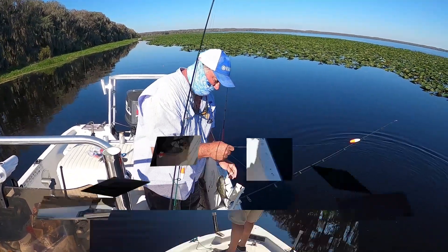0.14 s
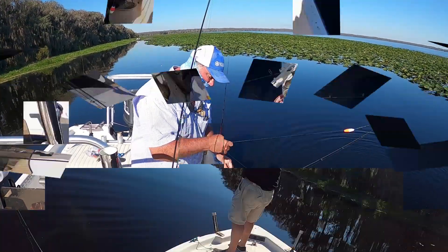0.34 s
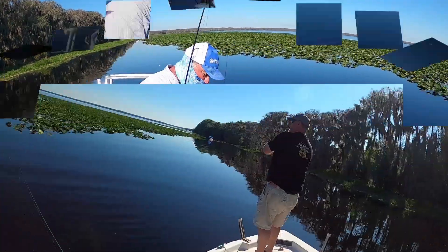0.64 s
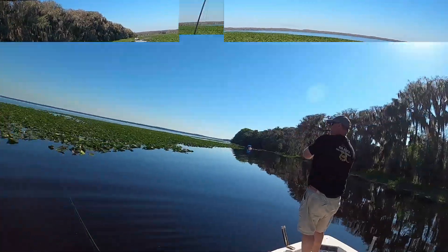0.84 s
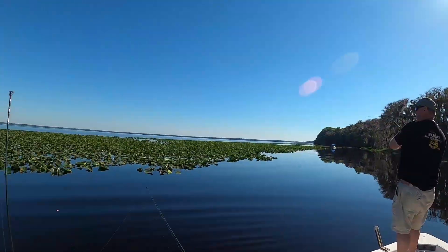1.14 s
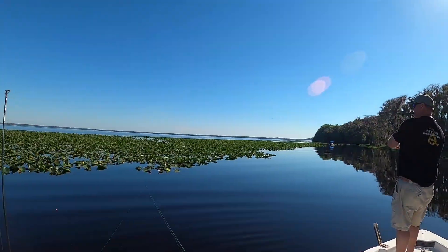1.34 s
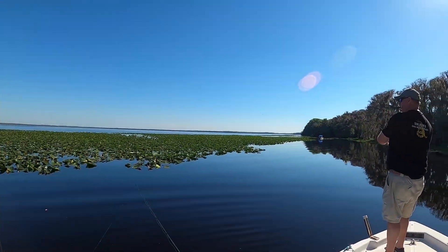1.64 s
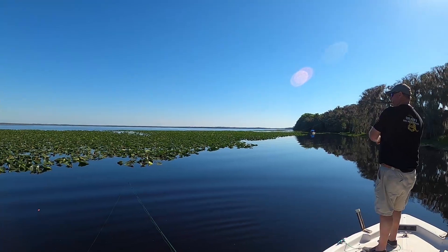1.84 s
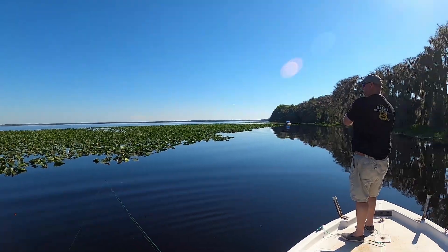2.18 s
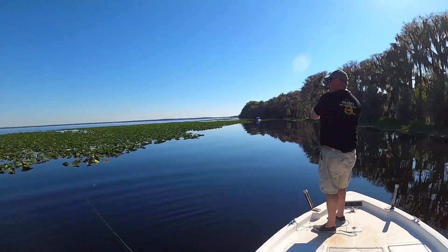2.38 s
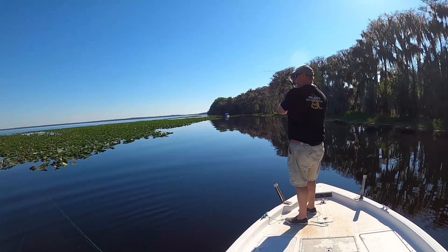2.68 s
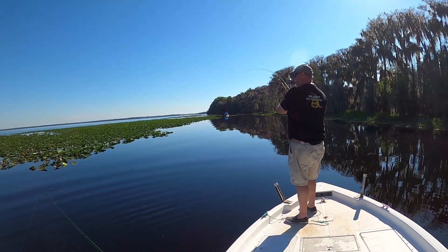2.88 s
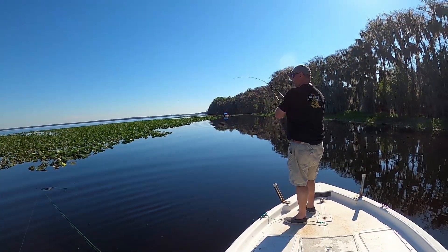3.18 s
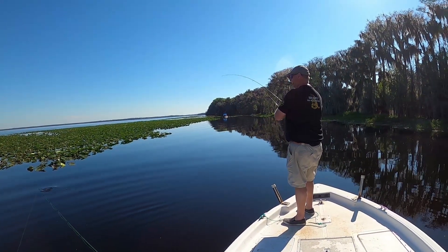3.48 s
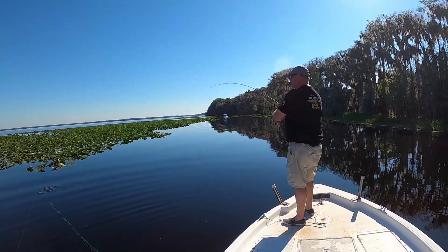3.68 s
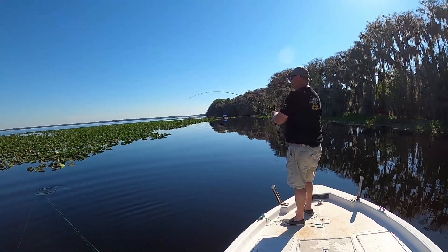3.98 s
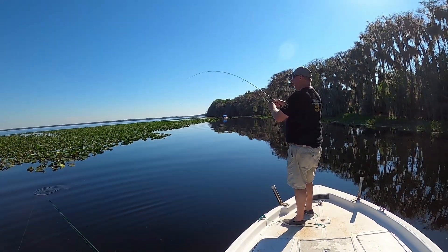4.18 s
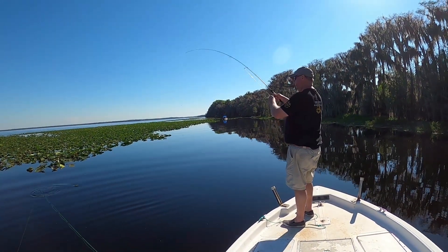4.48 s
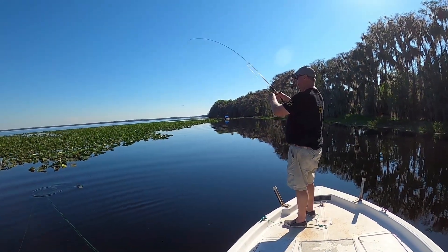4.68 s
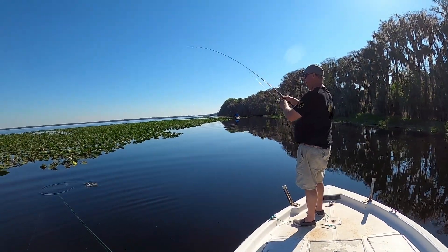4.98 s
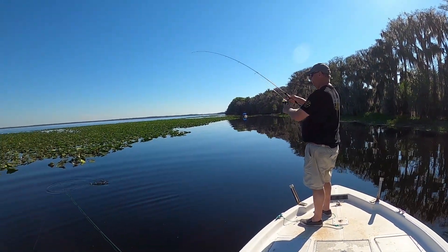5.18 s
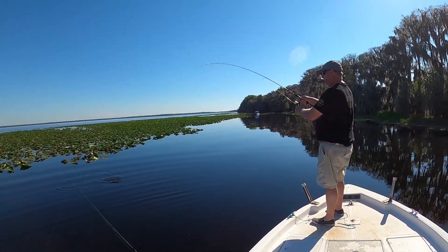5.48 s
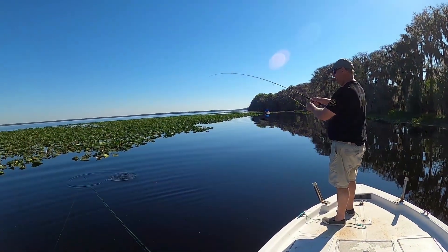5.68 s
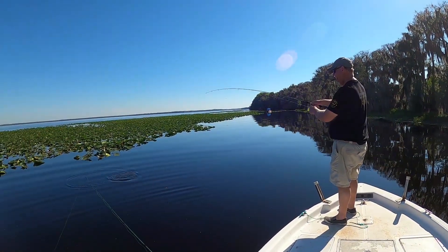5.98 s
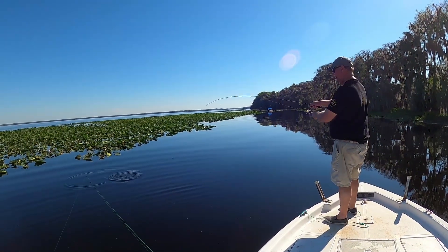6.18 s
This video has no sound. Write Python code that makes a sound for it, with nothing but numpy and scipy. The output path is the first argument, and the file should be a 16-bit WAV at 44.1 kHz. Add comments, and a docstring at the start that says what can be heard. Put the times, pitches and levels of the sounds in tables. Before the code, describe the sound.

Hard plastic clacks and dull hollow thumps on a small fiberglass boat over a low drone, a brief silence early, faint distant splashes later.

```python
"""Scuffs, clacks, creaks and dull thumps on a small fiberglass fishing boat on a calm lake: a camera on a mount
is gripped and swung round, while a hooked fish splashes some way off. Under it lie a low drone and a faint
hiss; near the start all sound stops for a moment and the scene changes, the opening having fainter air and a
drone that differs between the ears. Clacks are shaped noise bursts plus struck modes, creaks trains of jerks,
thumps and bubbles decaying sines; scuffs, swishes, spray, drone and hiss are coloured noise under envelopes."""
import sys
import numpy as np
from scipy import signal
from scipy.fft import rfft, irfft, next_fast_len
from scipy.io import wavfile
from scipy.ndimage import map_coordinates

SR = 44100
rng = np.random.default_rng(int(sys.argv[2]) if len(sys.argv) > 2 else 0)


def to_wav(s):
    """Save 16-bit WAV."""
    ch = np.atleast_2d(s).T  # columns
    pcm = np.round(np.clip(ch, -1, 1) * 32767)  # PCM
    wavfile.write(sys.argv[1], SR, pcm.astype(np.int16))


N = 279367

# dropout of all sound: (from t/s, to t/s)
DROPOUT_S = (.575, .808)
# bouts of movement aboard: (start t/s, length/s, level/dB)
BOUTS = [(0, .57, -42), (.85, .4, -38.5), (1.37, .25, -48), (2.26, .1, -40), (2.37, .3, -34),
         (2.8, .28, -42), (3.45, .1, -48), (3.83, .1, -44), (4.04, .1, -36), (5.52, .3, -39),
         (5.98, .2, -46.5)]
# spectrum of a crack at contact: (f/Hz, relative density/dB)
CRACK_SPECTRUM = [(200, -2), (500, 4.5), (740, 4), (900, -7), (1500, 0.5), (2800, -0.5), (4200, -6),
                  (6200, -15), (7600, -23), (9200, -26), (11000, -38.5), (15000, -58.5)]
# spectrum of the low drone: (f/Hz, relative density/dB)
DRONE_SPECTRUM = [(32, -32), (55, -13), (75, -1), (92, -7), (118, 1), (176, -8.5), (197, -6), (217, -3),
                  (251, -11.5), (276, -15.5), (323, -18), (365, -17.5), (615, -28.5), (678, -41.5),
                  (1000, -43), (1300, -58), (2200, -120)]


def amp(db):
    """Decibels to gain."""
    return 10 ** (np.asarray(db) / 20)


def unit(x):
    """Scale to rms 1."""
    return x / np.sqrt(np.mean(x ** 2) + 1e-20)


def along(points, hz):
    """(f/Hz, value) points interpolated on a log frequency axis."""
    f, v = np.transpose(points)
    return np.interp(np.log(hz + 1), np.log(f + 1), v)


def curves(rows, outside=None):
    """One value per sample for each column after the time."""
    s, *cols = np.transpose(rows)
    return [np.interp(np.arange(N) / SR, s, c, outside, outside) for c in cols]


def wobble(knots_per_s):
    """Smooth random curve through normally distributed knots."""
    knots = rng.standard_normal(int(N * knots_per_s / SR) + 4)
    return map_coordinates(knots, [np.arange(N) * knots_per_s / SR])


def filtered(x, response):
    """x filtered by a zero-phase gain of frequency."""
    m = next_fast_len(N + SR // 2)
    return irfft(rfft(x, m) * response(np.fft.rfftfreq(m, 1 / SR)), m)[..., :N]


def lowpassed(x, order, cutoff_hz):
    """Butterworth lowpass."""
    return signal.lfilter(*signal.butter(order, cutoff_hz, fs=SR), x)


def noise(spectrum, grain_db=0, grain_rate=300):
    """Coloured noise of rms 1, optionally clumped into grains."""
    clumps = amp(grain_db * wobble(grain_rate))
    return unit(filtered(clumps * rng.standard_normal(N), lambda hz: amp(along(spectrum, hz))))


def causal(x, gain):
    """Minimum-phase filter with a gain per frequency bin: no ringing ahead of the sound."""
    cepstrum = irfft(np.log(np.maximum(gain, 1e-6)))
    cepstrum[1:len(x) // 2] *= 2
    cepstrum[len(x) // 2 + 1:] = 0
    return irfft(rfft(x) * np.exp(rfft(cepstrum)))


def add(track, s, sound):
    """Mix a sound into the track at time s."""
    part = track[max(round(s * SR), 0):][:len(sound)]
    part += sound[:len(part)]


def envelope(start, length, attack_s, release_db_per_s):
    """Gain that rises to 1 at the start, holds for the length and dies away."""
    t = np.arange(N) / SR - start
    return np.clip(1 + t / attack_s, 0, 1) * amp(-release_db_per_s * np.maximum(t - length, 0))


def after_gap():
    """True from the middle of the dropout on."""
    return np.arange(N) / SR > np.mean(DROPOUT_S)


def ambient(deck):
    """Drone and open air; movement aboard and the deck's thumps stir the hull above them."""
    # bass of the stirred hull: (f/Hz, relative density/dB)
    rumble_spectrum = [(10, -6), (25, 5.5), (45, 9), (75, 6.5), (110, -18.5), (200, -61), (500, -120)]
    # open air: (f/Hz, relative density/dB)
    air_spectrum = [(350, -21), (600, -1.5), (850, -5.5), (1300, 2), (2100, -5.5), (4000, -18), (7000, -22),
                    (11000, -51)]
    # narrow hum inside the drone: (f/Hz, relative density/dB)
    hum_spectrum = [(180, -45.5), (200, -8.5), (215, -0.5), (232, -8.5), (260, -44.5), (1000, -120)]
    # open air over time: (t/s, level/dB)
    air_level = [(1.5, -64), (2.2, -66.5), (3.9, -68), (4.35, -72), (4.9, -68), (5.4, -69), (6.3, -72.5)]
    floor_rumble_db, floor_drone_db, hum_db = -62, -46.5, -55.5
    rumble_db, boom_db, clatter_db = 2.5, -2, -25.5  # bass, low mids and mids, over the bout
    attack_s, release_db_per_s = .04, 75
    aftersound_db, aftersound_s = -20, .045  # the hull booms on after each thump
    boom_top_hz = 300  # shifting weight stirs mostly the low panels
    opening_air_db = -11  # fainter air, without hum, before the gap

    bouts = [amp(db) * envelope(s, length, attack_s, release_db_per_s) for s, length, db in BOUTS]
    stir = np.max(bouts, 0)
    keep = np.exp(-1 / (aftersound_s * SR))
    deck_power = signal.lfilter([1 - keep], [1, -keep], deck ** 2)
    aftersound = amp(aftersound_db) * np.sqrt(deck_power)

    boom = amp(boom_db) * stir * unit(lowpassed(noise(DRONE_SPECTRUM), 1, boom_top_hz))
    rumble = np.hypot(amp(floor_rumble_db), amp(rumble_db) * stir) * noise(rumble_spectrum)
    drone = np.hypot(amp(floor_drone_db) * after_gap(), aftersound) * noise(DRONE_SPECTRUM)
    air = np.hypot(amp(curves(air_level)[0]), amp(clatter_db) * stir) * noise(air_spectrum)
    hum = amp(hum_db) * noise(hum_spectrum)
    return rumble + boom + drone + np.where(after_gap(), air + hum, amp(opening_air_db) * air)


def swish():
    """Faint hiss swelling into swishes with a narrow airy band, perhaps a sleeve as the camera turns."""
    # swishes: (middle t/s, half length/s, broad hiss level/dB, narrow band level/dB)
    swish_rows = [(1.12, .08, -63, -80), (1.86, .07, -62.5, -62), (2.09, .08, -72, -66),
                  (2.36, .08, -60, -80), (3.3, .1, -69, -80), (3.75, .06, -72, -64), (3.9, .05, -64, -69),
                  (4.6, .08, -75, -80), (5.25, .15, -71, -85), (5.58, .06, -61, -80), (6.33, .05, -73, -80)]
    # broad hiss: (f/Hz, relative density/dB)
    hiss_spectrum = [(1500, -18), (2400, -2.5), (3600, -1), (4400, -2.5), (5100, -3.5), (5700, -3.5),
                     (6700, -7), (7800, -15.5), (8900, -10), (10500, -23), (12000, -45.5), (15000, -67.5)]
    # narrow band: (f/Hz, relative density/dB)
    band_spectrum = [(1500, -60), (3400, -25), (4300, 0), (4900, 1), (5400, -2), (6200, -18), (12000, -70)]
    floor_hiss_db = -84
    t = np.arange(N) / SR
    broad, narrow = amp(floor_hiss_db), 0
    for s, half_length, hiss_db, band_db in swish_rows:
        swell = np.exp(-.5 * ((t - s) / half_length) ** 2)
        broad = broad + amp(hiss_db) * swell
        narrow = narrow + amp(band_db) * swell
    band = noise(band_spectrum, grain_db=2.5, grain_rate=53)
    return broad * noise(hiss_spectrum, grain_db=2.0, grain_rate=500) + narrow * band


def rubbing():
    """Skin drags over the housing in gritty grains, stroke by stroke."""
    # strokes of a hand: (start t/s, length/s, scrape level/dB, body level/dB, scrape lowpass f/Hz)
    stroke_rows = [(0, .005, -45, -50, 1900), (.08, .035, -51, -40, 1300), (.187, .025, -61, -54, 1700),
                   (.838, .025, -42.5, -37, 4000), (.875, .018, -40, -32, 4000),
                   (.943, .012, -46, -38, 7400), (1.008, .02, -51, -58, 7400), (1.05, .09, -52, -58, 4000),
                   (1.15, .045, -44, -42, 7400), (1.81, .07, -64, -58, 5000), (2.43, .04, -51, -43, 6000),
                   (5.495, .06, -59, -58, 7400)]
    # gritty scrape: (f/Hz, relative density/dB)
    scrape_spectrum = [(500, -22), (900, -13), (1600, 2.5), (2200, 0), (2800, 4), (3500, -5), (4600, -0.5),
                       (6000, -15), (9500, -24.5), (12000, -44), (15000, -59)]
    # body of the housing: (f/Hz, relative density/dB)
    housing_spectrum = [(150, -21.5), (240, -8), (330, 0.5), (400, -1.5), (455, -4), (495, 6.5),
                        (545, -9.5), (620, -15.5), (750, -5.5), (900, -21), (1200, -16.5), (1700, -35),
                        (5000, -81.5)]
    attack_s, release_db_per_s = .018, 340
    track = np.zeros(N)
    grit = noise(scrape_spectrum, grain_db=3.5, grain_rate=280)
    body = noise(housing_spectrum, grain_db=1.5, grain_rate=77)
    for start, length, scrape_db, body_db, top_hz in stroke_rows:
        scrape = unit(lowpassed(grit, 2, min(top_hz, SR / 2 - 1)))
        pressure = envelope(start, length, attack_s, release_db_per_s)
        track += pressure * (amp(scrape_db) * scrape + amp(body_db) * body)
    return track


def ring(t, damping, scatter_db):
    """Decaying modes of the plastic mount, struck at new strengths; damping divides their t60."""
    # mount modes: (f/Hz, relative level/dB, t60/s at damping 1)
    mode_rows = [(801, -20, .05), (1520, -11.5, .04), (1757, -10.5, .045), (1942, -6, 0.041),
                 (2380, -14, .045), (2530, -15, .045), (3150, -8.5, .05), (3384, 0, 0.037),
                 (3463, -4, 0.017), (3576, -14.5, .045), (4170, -15, .035), (5000, -13.5, .035),
                 (5630, -17, .035), (6193, -23.5, .035), (8800, -34, 0.087)]
    hz, db, t60 = np.transpose(mode_rows)[:, :, None]
    level_db = db + scatter_db * rng.standard_normal(hz.shape)
    strength = rng.choice([-1, 1], hz.shape) * amp(level_db)
    modes = strength * amp(-60 * damping * t / t60) * np.sin(2 * np.pi * hz * t)
    return unit(np.sum(modes, 0) * (1 - np.exp(-t * SR / 10)))


def crack_t60(db):
    """The lighter the touch, the longer its crack."""
    full_force_s, linger_s_per_db = .015, .0003
    return max(full_force_s - linger_s_per_db * db, .003)


def contact(hollow_db, bright_db, ring_hz, t60, ring_db=-9, focus_db=8, focus_octaves=.16,
            attack_s=0.00075, tail_db=-26, tail_t60=0.13, size=4096):
    """One clack: a crack, the mount's short ring and a faint, duller scatter from the deck."""
    t, hz = np.arange(size) / SR, np.fft.rfftfreq(size, 1 / SR)
    scatter = lowpassed(rng.standard_normal(size), 1, 3000)
    burst = rng.standard_normal(size) * amp(-60 * t / t60) + scatter * amp(tail_db - 60 * t / tail_t60)
    crack = unit(causal(burst, amp(along(CRACK_SPECTRUM, hz))))
    clack = crack + amp(ring_db) * ring(t, damping=3.0, scatter_db=4)

    # each struck part has one broad resonance of its own
    octaves_off = np.log2((hz + 1) / ring_hz)
    focus = amp(focus_db * np.exp(-.5 * (octaves_off / focus_octaves) ** 2))
    clack = causal(clack * (1 - np.exp(-t / attack_s)), focus)

    # place and hardness of the contact set how hollow and how bright it is
    power = np.abs(rfft(clack)) ** 2

    def share_db(lo_hz, hi_hz):
        """Band power relative to that above 1200 Hz."""
        return 10 * np.log10(power[(hz > lo_hz) & (hz < hi_hz)].sum() / power[hz > 1200].sum())

    low_db = min(hollow_db, 8) - share_db(400, 1100)
    high_db = min(bright_db, 0) - share_db(5000, 12000)
    clack = causal(clack, amp(along([(900, low_db), (1300, 0), (3800, 0), (5500, high_db)], hz)))
    # level is set by the energy above 1200 Hz
    return clack / np.linalg.norm(rfft(clack)[hz > 1200]) * size / 2


def knocks(rattle_db=-18, rattle_s=0.008, count=2):
    """Hard parts clack against the mount and the hull; loose bits chatter just after."""
    # hard contacts: (t/s, relative strength/dB, hollow low-mid share/dB, bright edge share/dB,
    # strongest ring f/Hz); shares are capped in contact()
    knock_rows = [(.0775, -27, -5, -30, 2040), (.842, -28, -15, -28, 2680), (.9425, -19, -7, -24, 4030),
                  (.9597, -21.5, -4, -21, 4070), (1.1451, -29, 6, -9, 2660), (1.1508, -21, 8, -18, 1670),
                  (1.1636, -22, -11, -10, 2670), (1.1727, -14.5, -5, -16, 2690), (1.19, -19, -1, -18, 3850),
                  (1.242, -30.5, -3, -17, 2140), (1.3679, -15, -8, -7, 2750), (1.5472, -40, -4, -16, 2200),
                  (2.243, -29, -8, 0, 7300), (2.3585, -15.5, -7, -7, 2800), (2.372, -22, 1, -11, 3460),
                  (2.4579, -25, -13, -12, 1820), (2.4843, -5.5, -11, -11, 3280),
                  (2.5953, -18, -6.5, -15, 1450), (2.6189, -34, -5, 0, 7000), (2.6515, -21, -4, -36, 1450),
                  (2.816, -34, 8, -9, 1400), (2.8424, -41, 8, -25, 1210), (2.8884, -36.5, -3, -11, 1390),
                  (2.942, -41.5, 8, -8.5, 1460), (3.0116, -41, 8, -3, 1630), (3.0762, -37, 7, 0, 1340),
                  (3.1604, -43, -5, -10, 1370), (3.582, -38, 1, -13, 1300), (4.048, -30, 6, -17, 1400),
                  (4.102, -30.5, -2, -5, 4160), (4.1184, -28, 2, -13, 2130), (4.1285, -7, -3, -14, 2850),
                  (4.1735, -31, 8, -12, 1940), (4.2283, -27.5, -1, -31, 2040),
                  (4.7239, -28, -5.5, -15, 2530), (4.8688, -29.5, -1, -2, 2330),
                  (5.0433, -29, -25, -16, 3100), (5.305, -41, -8, 0, 7000), (5.4872, -28, -7, -6, 2100),
                  (5.5692, -16, -25, -10.5, 3300), (5.5792, -22.5, -7.5, -8.5, 2140),
                  (5.7, -41, -15, -6, 1400), (5.7306, -41.5, -15, -4, 1670), (5.7533, -39, -6, -8, 1500),
                  (5.7768, -23, -2, -15, 1350), (5.9818, -37.5, -3, -8, 1423)]
    track = np.zeros(N)
    for s, db, hollow_db, bright_db, ring_hz in knock_rows:
        clack = amp(db - 22.0) * contact(hollow_db, bright_db, ring_hz, crack_t60(db))
        add(track, s, clack)
        for delay, size in zip(rng.exponential(rattle_s, count), rng.standard_normal(count)):
            add(track, s + 0.0024 + delay, amp(rattle_db + 2 * size) * clack)
    return track


def thumps(overtone=3.4, overtone_db=-19, count=4):
    """A heavily damped fiberglass panel swells and dies within a few swings; once it judders."""
    # dull blows on the deck: (t/s, main swing envelope peak/dB, pitch f/Hz)
    thump_rows = [(.09, -26, 130), (.207, -27, 64), (.251, -27, 52), (.885, -17, 306), (.964, -17, 112),
                  (1.003, -13, 118), (1.017, -20, 51), (1.151, -17, 330), (1.156, -10.5, 78),
                  (1.193, -8, 170), (1.206, -17, 82), (1.244, -18, 47), (1.379, -18, 112),
                  (2.275, -17.5, 93), (2.374, -10, 67), (2.4, -15, 342), (2.419, -16, 168),
                  (2.4855, -17, 380), (2.486, -8.5, 101), (2.55, -14.5, 91), (2.597, -9.5, 118),
                  (2.657, -8.5, 96), (2.76, -21, 45), (2.813, -25, 130), (3.022, -22, 96), (3.476, -26, 99),
                  (3.518, -26, 89), (4.048, -26, 600), (4.131, -14, 715), (4.132, -15.5, 127),
                  (4.137, -9.5, 38), (4.228, -22, 54), (4.786, -23.5, 104), (5.534, -26, 109),
                  (5.575, -22.5, 39), (5.779, -9.5, 108)]
    swell_cycles = .56  # a panel peaks after this much of its own swing
    judder_s, judder_step_s, judder_db, judder_hz = 2.693, .016, -16.5, 120  # quick run of even blows
    track, t = np.zeros(N), np.arange(SR // 4) / SR
    judder = [(judder_s + k * judder_step_s, judder_db, judder_hz) for k in range(count)]
    for s, db, hz in thump_rows + judder:
        u = t * hz / swell_cycles
        swell = u * np.exp(1 - u)
        swing = np.sin(2 * np.pi * hz * t) * swell ** 1.4
        upper_hz = hz * overtone * rng.uniform(.85, 0.92)
        upper = np.sin(2 * np.pi * upper_hz * t) * swell
        add(track, s, amp(db) * (swing + amp(overtone_db) * upper))
    return track


def ticks():
    """After the dropout, loose parts tick faintly at random through each bout of movement."""
    ticks_per_s, over_bout_db, scatter_db = 18, -4, 3
    track = np.zeros(N)
    for start, length, db in BOUTS:
        if start < DROPOUT_S[1]:
            continue
        for when, size, tone in rng.random((round(ticks_per_s * length), 3)):
            tick_db = db + over_bout_db + scatter_db * (2 * size - 1)
            tick = contact(hollow_db=-3, bright_db=-8, ring_hz=1350 * 2 ** tone, t60=crack_t60(tick_db))
            add(track, start + when * length, amp(tick_db - 22.0) * tick)
    return track


def creak(jitter=.12, snap_db=-5, size=2048):
    """Stick-slip: the mount's tight joint slips in a quick run of jerks, each ringing the mount."""
    # slipping joint: (t/s, relative slip level/dB, slip rate/Hz)
    creak_rows = [(2.389, -11, 328), (2.396, -13, 410), (2.405, -12.5, 370), (2.409, -18.5, 320),
                  (2.414, -17, 270), (2.419, -45.5, 220)]
    slip_db, rate_hz = curves(creak_rows, outside=0)
    slips = np.flatnonzero(np.diff(np.ceil(np.cumsum(rate_hz) / SR))) + 1
    t, hz = np.arange(size) / SR, np.fft.rfftfreq(size, 1 / SR)
    track = np.zeros(N)
    for i in slips:
        burst = rng.standard_normal(size) * amp(-60 * t / .004)
        snap = unit(causal(burst, amp(along(CRACK_SPECTRUM, hz))))
        body = ring(t, damping=2, scatter_db=-1)
        slip_s = i / SR + jitter * rng.normal() / rate_hz[i]
        add(track, slip_s, amp(slip_db[i] - 20.5) * (body + amp(snap_db) * snap))
    return track


def splashes(cycles=16, rise=0.08, spread=0.07, count=6):
    """Each splash traps small bubbles that ring out, in a fine crackle of falling spray."""
    # splashes: (t/s, length/s, relative bubble level/dB, central bubble f/Hz, spray level/dB)
    splash_rows = [(3.163, .04, -46, 935, -72), (3.189, .006, -44, 2860, -72), (3.238, .05, -45, 1430, -66),
                   (4.715, .02, -52, 1500, -57), (4.82, .037, -42, 1340, -64),
                   (4.865, .037, -45, 1490, -62), (4.911, .01, -39, 2030, -64),
                   (4.923, .03, -41, 1260, -70), (4.985, .024, -48, 1350, -70), (5.04, .03, -53, 1450, -60),
                   (5.122, .044, -42, 1134, -69), (5.172, .01, -44, 1800, -66),
                   (5.204, .01, -49, 1700, -65), (5.303, .02, -45, 1550, -67),
                   (5.333, .006, -47, 2200, -67)]
    # spray: (f/Hz, relative density/dB)
    spray_spectrum = [(400, -22.5), (800, -1.5), (2200, 1.5), (4000, -4.5), (7000, -9.5), (11000, -28),
                      (15000, -55)]
    attack_s, release_db_per_s = .02, 130
    track, spray, t = np.zeros(N), np.zeros(N), np.arange(SR // 16) / SR
    for s, length, db, pitch_hz, spray_db in splash_rows:
        spray = np.hypot(spray, amp(spray_db) * envelope(s, length, attack_s, release_db_per_s))
        draws = zip(rng.random(count), rng.standard_normal(count), rng.standard_normal(count))
        for when, size, tone in draws:
            hz = pitch_hz * np.exp(spread * tone)
            age = t * hz / cycles
            rising = np.sin(2 * np.pi * hz * t * (1 + rise * age / 2))
            bubble = rising * np.exp(-3 * age) * (1 - np.exp(-20 * age))
            add(track, s + when * length, amp(db - 5.0 + 2 * size) * bubble)
    return track + spray * noise(spray_spectrum, grain_db=4.5, grain_rate=400)


def scene(opening_side_db=-53):
    """Sources sit in the centre; a trace of hiss and, before the gap, a drone differ between the ears."""
    # side hiss: (f/Hz, relative density/dB)
    side_spectrum = [(100, -3), (500, -18), (3000, -25), (9000, -23), (12000, -50), (15000, -69.5)]
    deck = thumps()
    centre = ambient(deck) + swish() + rubbing() + knocks() + deck + ticks() + creak() + splashes()
    side = amp(-85.5) * noise(side_spectrum)
    side = side + ~after_gap() * amp(opening_side_db) * noise(DRONE_SPECTRUM)
    return np.array([centre + side, centre - side])


def record(dry):
    """The sound cuts out for a moment and fades back in; a steep lowpass limits the band."""
    top_hz = 15500
    t = np.arange(N) / SR
    gap_start, gap_end = DROPOUT_S
    gate = np.interp(t, [gap_start, gap_start + .004, gap_end, gap_end + .02], [1, 0, 0, 1])
    return filtered(dry * gate, lambda hz: 1 / np.sqrt(1 + (hz / top_hz) ** 80))


dry = scene()
out = record(dry)
to_wav(out)
```